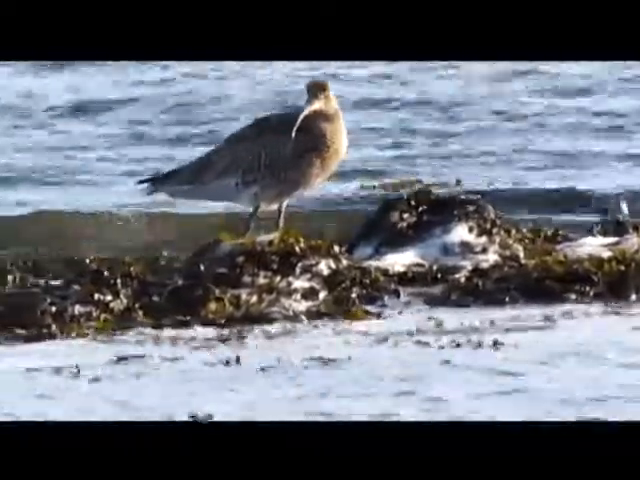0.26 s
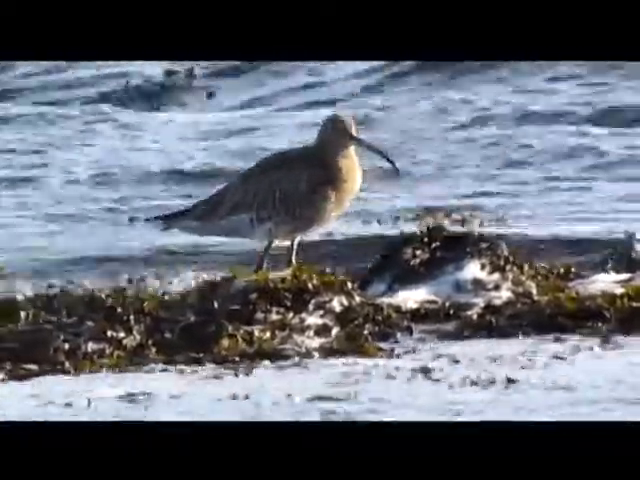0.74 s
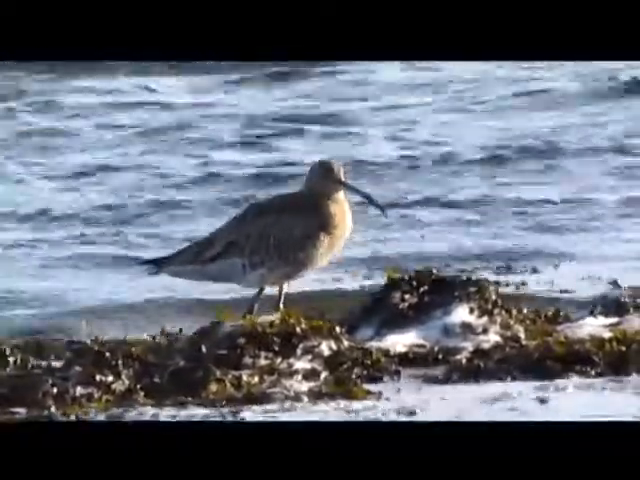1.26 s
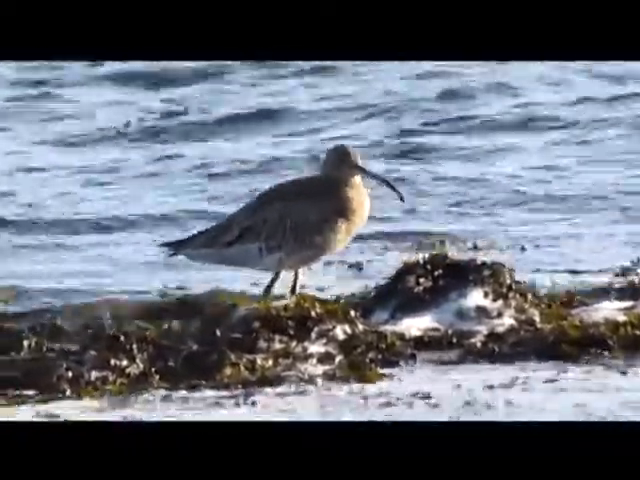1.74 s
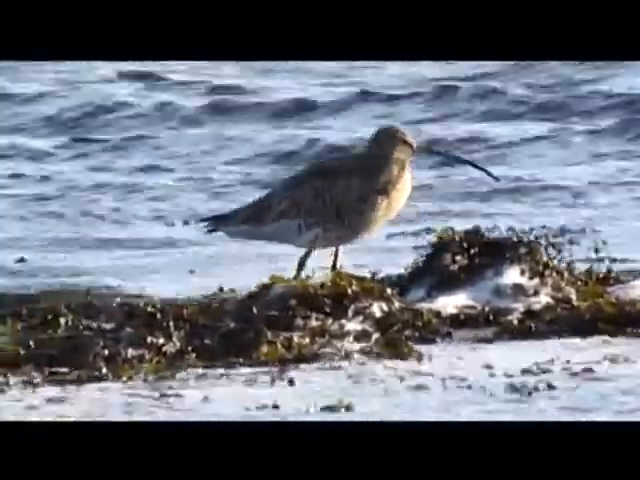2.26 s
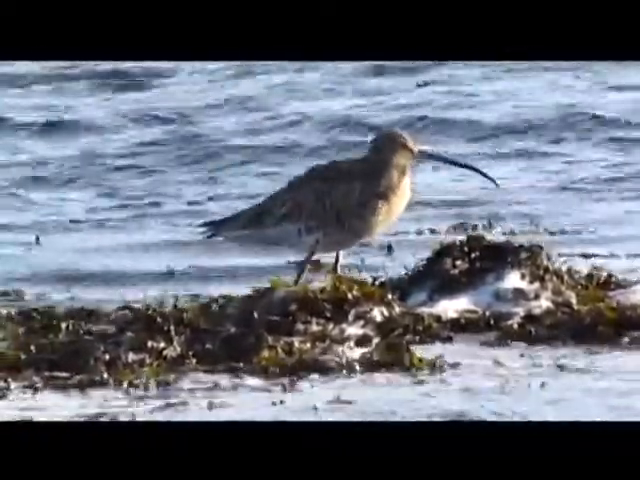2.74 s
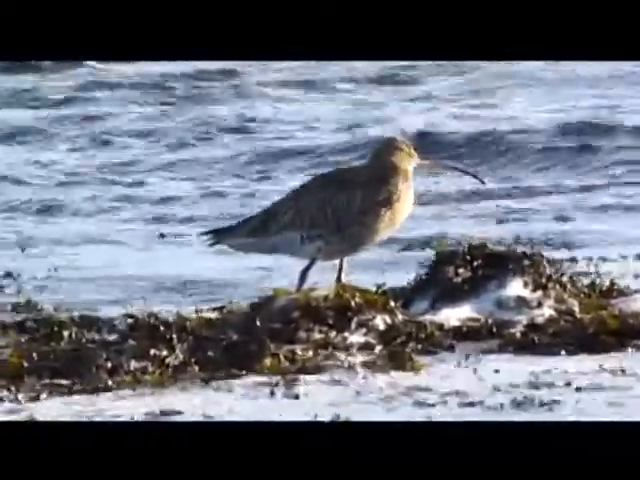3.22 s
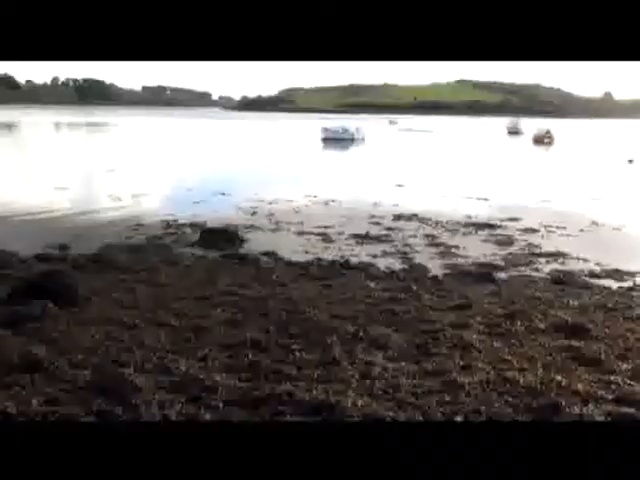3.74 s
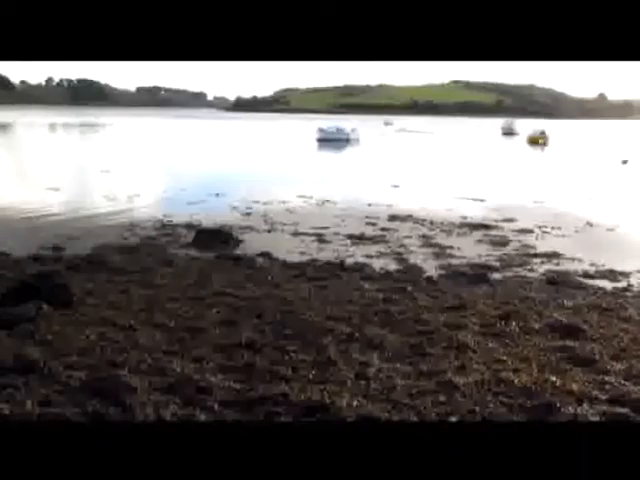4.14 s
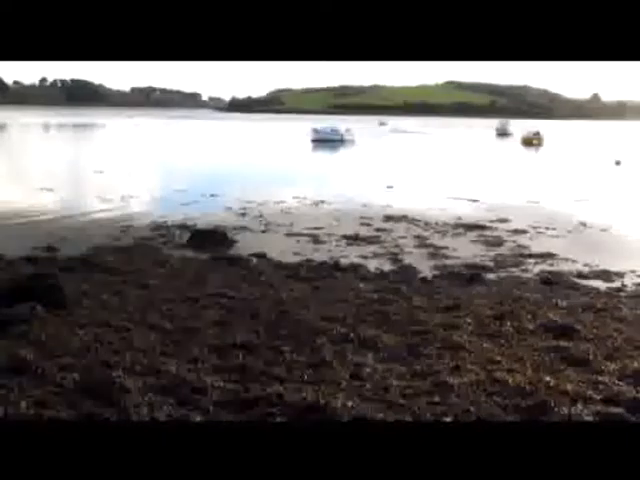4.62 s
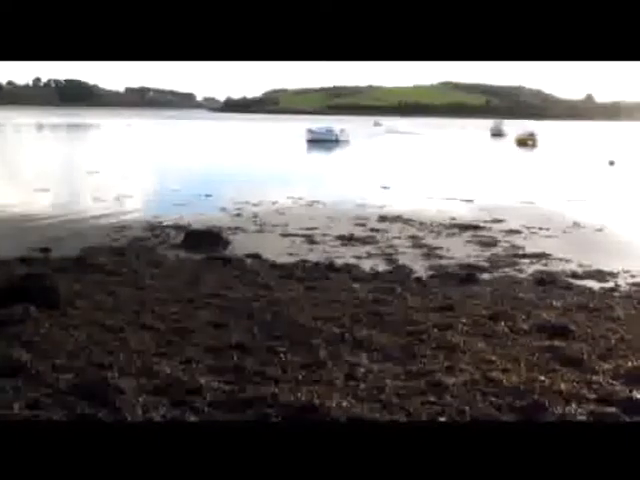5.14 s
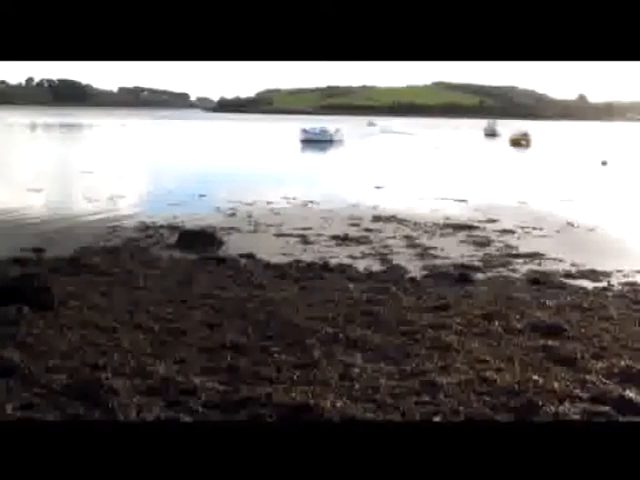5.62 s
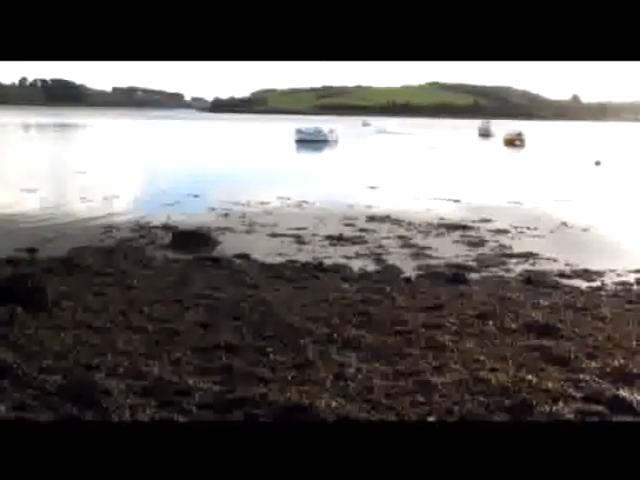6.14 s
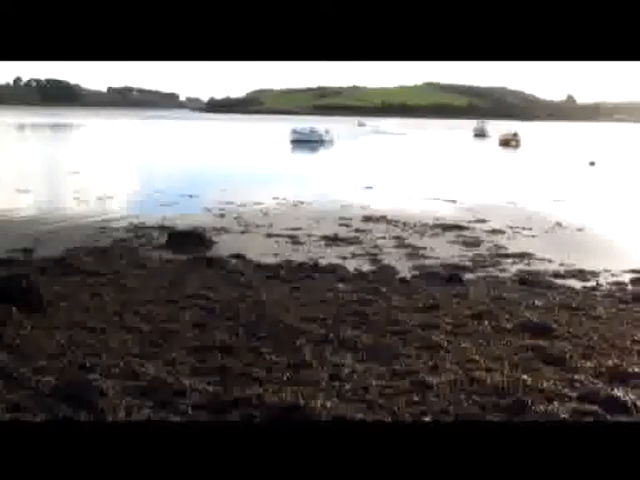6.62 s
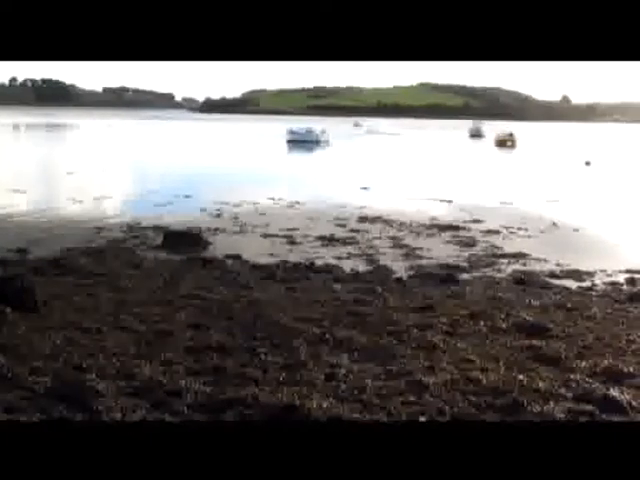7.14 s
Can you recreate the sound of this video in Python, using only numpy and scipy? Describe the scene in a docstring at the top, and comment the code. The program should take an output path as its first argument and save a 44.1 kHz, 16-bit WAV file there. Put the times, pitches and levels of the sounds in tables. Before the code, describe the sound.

Curlew-like bubbling over a distant throbbing warble, followed by repeated raspy, swooping whistles on open mudflats, the last phrase weak, then silence and a faint tick.

```python
"""Wading birds on an estuary: five phrases in which a hoarse rasp breaks into clear, wavering whistles, the last
one weaker. A bubbling trill comes first, over a far throbbing warble and hiss. Whistles are gliding near-sines,
rasps are resonant noise chopped into puffs, the warble is narrow noise flipping between two notes; sparse echoes
stand for the flats. A dish microphone and a narrow-band recorder take it in, cut to silence; a faint tick ends it."""
import sys
import numpy as np
from scipy import signal
from scipy.fft import rfft, irfft
from scipy.io import wavfile
from scipy.ndimage import uniform_filter1d

SR = 44100
rng = np.random.default_rng(int(sys.argv[2]) if len(sys.argv) > 2 else 0)


def transcribe(u):
    """Save the signal u as a 16-bit wav file named by the first command-line argument.

    u: samples, shape (n,) or (channels, n), limited to [-1, 1]; the rate is SR.
    q: integer samples, one column per channel.
    """
    v = np.clip(np.atleast_2d(u).T, -1, 1)
    q = np.round(v * 32767).astype(np.int16)
    wavfile.write(sys.argv[1], SR, q)


N = 325458

# Hiss colour before levelling: (frequency [Hz], relative density [dB per Hz])
HISS_COLOUR = [(380, -66), (650, -27.5), (859, -5), (1370, -7.5), (1530, -6), (2080, -4.5), (4350, -15.5),
               (5660, -42), (9570, -120)]
# Hiss over time: (time [s], level [dB])
HISS_LEVEL = [(0, -50.5), (1, -54.5), (2, -51), (2.401, -54.5), (2.95, -61), (3.099, -59.5), (4.602, -61.5),
              (6.398, -68.5), (7.192, -90)]
# Low hiss colour before levelling: (frequency [Hz], relative density [dB per Hz])
LOW_HISS_COLOUR = [(100, -39), (170, -1.5), (400, -7), (700, -5), (1500, -13), (4500, -22)]
# Leak of the recorder's mirrored band: (frequency [Hz], gain [dB])
MIRROR_LEAK = [(6300, -8), (7200, -28.5), (7900, -55.5), (9000, -59), (10000, -81.5)]
# Faint tick at the end: (frequency [Hz], starting level [dB], decay by 60 dB [s])
TICK_TONES = [(522, -52, 0.15), (3460, -53, 0.26)]
# Far warble, about which each voice swings:
# (time [s], low voice [Hz], low level [dB], high voice [Hz], high level [dB])
FAR_WARBLE = [(0, 880, -56.5, 1429, -55.5), (.5, 843, -51.5, 1416, -49), (1.0, 865, -46.5, 1426, -47),
              (1.5, 897.4, -44, 1525, -52), (1.95, 892, -41, 1534, -49), (2.1, 860, -51, 1470, -73)]
# Echo tail over the flats: (frequency [Hz], decay by 60 dB [s])
FLATS_DECAY = [(800, 0.46), (1400, 0.47), (1900, 1.24), (2500, 0.21), (4000, 0.64)]
# Quick rising chirp that opens each run of the trill: (time [s], level [dB])
PICKUPS = [(0, -62.5), (0.741, -62), (1.481, -62.5)]
# Short notes of the trill's lower voice, each an arch of pitch and level:
# (start [s], climb [s], drop [s], crest pitch [Hz], crest level [dB])
BUBBLES = [(0.018, 0.011, 0.018, 1750, -40.5), (0.05, 0.031, 0.021, 1855, -34.5),
           (0.105, .027, 0.016, 2020, -28.5), (0.181, 0.0098, 0.01, 2097, -24.5),
           (0.225, 0.03, 0.014, 2100, -29.5), (0.31, 0.0023, 0.023, 2055, -34.5),
           (0.418, 0.0035, 0.0098, 2053, -36.5), (0.758, 0.011, .014, 1740, -40.5),
           (0.784, 0.03, 0.043, 1840, -34.5), (.848, 0.027, 0.0098, 1990, -32.5),
           (.923, 0.0044, 0.019, 2046, -24.5), (0.983, 0.0026, .024, 2092, -22),
           (1.041, 0.0062, .026, 2094, -24.5), (1.178, 0.0015, 0.016, 2100, -27.5),
           (1.354, 0.0022, .008, 2490, -32), (1.493, 0.0086, 0.011, 1790, -36),
           (1.517, 0.0089, 0.013, 2054, -38), (1.541, 0.0045, 0.024, 1913, -35),
           (1.58, 0.023, 0.033, 1980, -36), (1.637, 0.027, 0.028, 2020, -37),
           (1.714, 0.0087, .015, 2020, -35.5)]
# Short notes of the trill's upper voice, which climb and break off: (start [s], end [s], top [Hz], top level [dB])
FLIPS = [(0.16, 0.182, 2570, -29), (0.274, 0.311, 2590, -28), (0.887, 0.926, 2540, -36),
         (0.951, 0.986, 2585, -27.5), (1.015, 1.042, 2560, -28), (1.762, 1.79, 2480, -30)]
# Held notes of the trill and of far birds, a list of turning points each: (time [s], pitch [Hz], level [dB])
HELD_NOTES = [
    [(.338, 2483, -31.5), (.367, 2577, -27.5), (.4, 2484, -37.5), (.423, 2620, -44)],
    [(.445, 2510, -56), (.475, 2570, -42.5), (.497, 2466, -48.5), (.545, 2500, -38.5), (.597, 2448, -40.5),
     (.622, 2900, -32.5)],
    [(1.082, 2455, -29), (1.102, 2478, -23.5), (1.146, 2443, -34.5), (1.18, 2580, -23.5)],
    [(1.202, 2410, -24), (1.216, 2364, -32.5), (1.242, 2550, -24), (1.272, 2420, -35.5), (1.3, 2583, -25.5),
     (1.332, 2354, -34.5), (1.357, 2970, -30.5)],
    [(1.685, 1783, -39.5), (1.74, 1806, -39.5), (1.87, 1746, -40), (1.912, 1950, -37.5)],
    [(1.887, 2340, -44), (1.931, 2360, -39), (1.955, 2285, -45)],
    [(2.032, 1668, -43), (2.136, 1633, -49.5)],
    [(2.667, 2430, -49.5), (2.684, 2460, -58)],
    [(2.79, 1870, -63.5), (2.95, 1980, -67.5)],
]
# Hoarse stretches where the whistle gives way:
# (start [s], end [s], start level [dB], middle level [dB], end level [dB])
RASPS = [(3.0, 3.065, -67, -40, -32.5), (3.099, 3.157, -43.5, -44.5, -41),
         (3.181, 3.198, -34, -36.5, -29.5), (3.265, 3.344, -48.5, -36, -26),
         (3.408, 3.439, -44.5, -38.5, -29), (3.864, 3.911, -49.5, -29.5, -26.5),
         (3.95, 4.091, -42, -47.5, -25), (4.161, 4.264, -42.5, -41.5, -27),
         (4.735, 4.778, -53, -36.5, -23.5), (4.835, 4.948, -33.5, -35.5, -23.5),
         (5.024, 5.088, -40, -31.5, -21.5), (5.651, 5.714, -52, -30, -19.5),
         (5.784, 5.887, -33, -32, -25.5), (5.995, 6.021, -34, -31, -25.5), (6.541, 6.591, -62, -39, -27.5),
         (6.638, 6.646, -42, -44, -44), (6.676, 6.808, -48.5, -42.5, -38.5)]
# Partials of the two voices that clash in a rasp:
# (start [Hz], end [Hz], blur before scaling by length [Hz], relative level [dB])
THROAT_PARTIALS = [(1076, 1100, 740, -7.5), (1233, 1843, 450, 5.5), (1730, 2360, 780, 6.5),
                   (2870, 3400, 560, -2.5), (3180, 4100, 910, -8)]
# Crests and troughs of the phrases, one list a phrase, before scoops, accents and catches:
# (time [s], pitch [Hz], level [dB])
PHRASES = [
    [(3.067, 1787, -27.5), (3.102, 1470, -38), (3.213, 1990, -21), (3.262, 1408, -32.5), (3.342, 2384, -18),
     (3.358, 1960, -25), (3.39, 1480, -31.5), (3.45, 1997, -20.5), (3.49, 1604, -29), (3.54, 1829, -25),
     (3.588, 1670, -29), (3.632, 1723, -28.5), (3.65, 1592, -43)],
    [(3.908, 1957, -20), (3.957, 1399, -28), (4.102, 2052, -17.5), (4.155, 1428, -31.5),
     (4.274, 2055, -17.5), (4.316, 1512, -29.5), (4.394, 1923, -21), (4.435, 1642, -27.5),
     (4.472, 1537, -29.5), (4.486, 1474, -38)],
    [(4.788, 1945, -17.5), (4.842, 1294, -24), (4.962, 2041, -14.5), (5.018, 1352, -30), (5.1, 2115, -15.5),
     (5.145, 1483, -26), (5.22, 1984, -18), (5.262, 1557, -27.5), (5.333, 1942, -21), (5.372, 1723, -24.5),
     (5.395, 1540, -32)],
    [(5.712, 2053, -15.5), (5.778, 1343, -27.5), (5.909, 2073, -15.5), (5.962, 1483, -25.5),
     (6.043, 2070, -17), (6.09, 1488, -26), (6.152, 1991, -19), (6.198, 1614, -27), (6.276, 1697, -27)],
    [(6.596, 1982, -24), (6.66, 1340, -43), (6.827, 2076, -29.5), (6.882, 1467, -38.5),
     (6.968, 2063, -33.5), (7.008, 1522, -41.5), (7.08, 1995, -40.5), (7.125, 1685, -46),
     (7.168, 1666, -52.5)],
]
# The voice jumps to the overtone of a weak low tone:
# (start [s], end [s], start pitch [Hz], end pitch [Hz], start level [dB], end level [dB])
JUMPS = [(3.144, 3.18, 2044, 2270, -32, -28.5), (4.055, 4.07, 2146, 2330, -41.5, -25),
         (4.193, 4.244, 1936, 2300, -39, -25.5), (5.735, 5.76, 2213, 1960, -24, -29),
         (5.937, 5.951, 2034, 2010, -35, -25.5), (6.073, 6.123, 2052, 1980, -29, -27.5),
         (6.619, 6.641, 2166, 2060, -34, -42), (6.853, 6.869, 2093, 2010, -44.5, -44)]
# The voice catches while it falls: (time [s], level change [dB])
CATCHES = [(3.232, -6), (4.139, -5), (4.813, -3), (4.988, -11.5)]

LOW_HISS_DB = -72
THROBS_PER_S = 12.3
BAND_HZ, CLOCK_HZ, EDGE_HZ = 4700, 11025, 10300  # recorder band, converter clock, final edge
STOP_S, TICK_S = 7.189, 7.349  # cut to silence, then the tick
# How far a bubble lies under its crest (share of pitch, dB) that long before and after it
CLIMB_S, CLIMB_SHARE, CLIMB_DB = 0.04, 0.07, -7.5
DROP_S, DROP_SHARE, DROP_DB = 0.029, 0.11, -10
FLIP_SHARE, FLIP_DB = 0.05, -5.5  # a flip starts this far under its top
RISE_LATE, FALL_LATE = 1.5, 0.9  # powers of time: a rise lingers low, a fall sets in a little early
ACCENT_DB, ACCENT_S = 1, 0.0028  # each phrase whistle starts hard
SCOOP_SHARE, SCOOP_S = 0.05, 0.008  # a whistle that starts on a rise scoops up from below
CATCH_S = 0.006


def gain_of(db):
    """Decibels to gain."""
    return 10 ** (np.asarray(db) / 20)


def evened(x):
    """Scales to rms 1."""
    return x / np.sqrt(np.mean(x ** 2) + 1e-20)


def read(points, hz):
    """Straight lines on a log-frequency axis."""
    f, value = np.transpose(points)
    return np.interp(np.log(hz + 1), np.log(f + 1), value)


def curves(rows, round_s):
    """Start time and the columns at sample rate, with corners rounded."""
    s, *columns = np.transpose(rows)
    t = np.arange(s[0], s[-1], 1 / SR)
    size = 1 + round(round_s * SR)
    return s[0], [uniform_filter1d(np.interp(t, s, c), size, mode="nearest") for c in columns]


def add(mix, s, sound):
    """Mixes a sound in at s seconds."""
    part = mix[round(s * SR):][:len(sound)]
    part += sound[:len(part)]


def smooth_noise(n, hz):
    """Noise of rms 1, low-passed at hz."""
    noise = rng.standard_normal(n + 2000)
    return evened(signal.lfilter(*signal.butter(2, hz, fs=SR), noise)[2000:])


def resonate(x, hz, width):
    """Shifts hz down to zero, smooths, and shifts back: a resonance of gain 1."""
    turn = np.exp(2j * np.pi * np.cumsum(hz * np.ones(len(x))) / SR)
    r = np.exp(-np.pi * width / SR)
    return 2 * (turn * signal.lfilter([1 - r], [1, -r], x / turn)).real


def resonate_twice(x, hz, width):
    """Two equal resonances in a row, for steeper skirts."""
    return resonate(resonate(x, hz, width), hz, width)


def hiss(spectrum, patchy_db):
    """Random short-time spectra with drifting patches, at rms 1."""
    hz = np.fft.rfftfreq(512, 1 / SR)
    a, b, patches = rng.standard_normal((N // 128 + 5, 257, 3)).T
    patches = evened(uniform_filter1d(uniform_filter1d(patches, 4, 0), 24, 1))
    z = (a + 1j * b) * gain_of(read(spectrum, hz)[:, None] + patchy_db * patches)
    return evened(signal.istft(z, nperseg=512, noverlap=384)[1][:N])


def background_hiss():
    """A hiss whose level drifts, over a steady, weaker low hiss."""
    s, level_db = np.transpose(HISS_LEVEL)
    level = gain_of(np.interp(np.arange(N) / SR, s, level_db))
    low = gain_of(LOW_HISS_DB) * hiss(LOW_HISS_COLOUR, patchy_db=0.5)
    return level * hiss(HISS_COLOUR, patchy_db=1.2) + low


def tick():
    """Two faint, unsteady tones struck together after the silence, each dying exponentially."""
    t = np.maximum(np.arange(N) / SR - TICK_S, 0)
    wobble = 1 + 0.55 * smooth_noise(N, 164)
    tones = [gain_of(db - 60 * t / t60) * np.sin(2 * np.pi * hz * t) for hz, db, t60 in TICK_TONES]
    return wobble * sum(tones)


def warble():
    """Two far voices of narrow noise that flip together between an upper and a lower note."""
    s, (low_hz, low_db, high_hz, high_db) = curves(FAR_WARBLE, 0.081)
    cycles = THROBS_PER_S * np.arange(len(low_hz)) / SR + 0.033
    swing = np.tanh(3.9 * np.cos(2 * np.pi * cycles))
    out = np.zeros(N)
    # pitch, level, depth of the swing (share), blur in Hz, level swing in dB
    low_voice = (low_hz, low_db, 0.1, 45, 2.5)
    high_voice = (high_hz, high_db, 0.06, 60, 4.0)
    for hz, db, depth, width, upper_db in (low_voice, high_voice):
        air = rng.standard_normal(len(hz))
        voice = evened(resonate_twice(air, hz * (1 + depth * swing), width))
        fade = 0.42 + 0.14 * swing ** 2  # weaker while it flips
        add(out, s, gain_of(db + upper_db * swing) * voice * fade)
    return out


def flats(x):
    """Sparse echoes of random sign from mud and water, each band dying at its own speed."""
    taps = np.zeros(2 * SR)
    at = np.arange(400, 2 * SR - 20, 20) + rng.integers(0, 20, (2 * SR - 401) // 20)
    taps[at] = rng.choice([-1., 1.], at.shape)
    hz, t, z = signal.stft(taps, SR, nperseg=256)
    t60 = np.maximum(read(FLATS_DECAY, hz), 0.1)[:, None]
    tail = signal.istft(z * gain_of(-60 * t / t60), SR, nperseg=256)[1]
    return signal.fftconvolve(x, tail / np.linalg.norm(tail))[:N]


def whistle(rows, overtones_db, rough, attack_s, half_db=-120):
    """A near sine that flutters; the beak favours overtones near 3.8 kHz; half_db is an octave below."""
    end_s, end_hz, end_db = rows[-1]
    rows = [*rows, (end_s + 0.006, end_hz, end_db - 24)]  # each note dies in 6 ms
    s, (hz, level) = curves([(s, hz, gain_of(db)) for s, hz, db in rows], 0.011)
    n = len(hz)
    turn = 2 * np.pi * (np.cumsum(hz) / SR + rng.random())
    tone = np.sin(turn) + gain_of(half_db) * np.sin(turn / 2)
    for k, db in enumerate(overtones_db, 2):
        beak_db = -9.0 * np.clip((abs(k * hz - 3750) - 300) / 500, 0, 1.5) ** 2
        unsteady = 1 + 0.55 * smooth_noise(n, 140)
        tone += gain_of(db + beak_db) * np.sin(k * turn) * unsteady
    flutter = 1 + rough * smooth_noise(n, 120)
    i = np.arange(n)
    ends = np.clip(np.minimum(i / attack_s, i[::-1] / 0.002) / SR, 0, 1)
    return s, np.sqrt(2) * level * tone * flutter * np.sin(np.pi / 2 * ends) ** 2


def glide(points, t):
    """Rows at times t that ease from one turning point to the next."""
    s, hz, db = np.transpose(points)
    k = np.clip(np.searchsorted(s, t) - 1, 0, len(s) - 2)
    late = np.where(hz[k + 1] > hz[k], RISE_LATE, FALL_LATE)
    u = np.clip((t - s[k]) / (s[k + 1] - s[k]), 0, 1) ** late
    ease = np.sin(np.pi / 2 * u) ** 2
    return np.transpose([t, hz[k] + ease * (hz[k + 1] - hz[k]), db[k] + ease * (db[k + 1] - db[k])])


def moments(start, end):
    """Times at most about 2 ms apart."""
    return np.linspace(start, end, 3 + round(abs(end - start) / 0.002))


def effort(voice):
    """Short-term loudness of a voice, which drives its breath."""
    return np.sqrt(abs(uniform_filter1d(voice ** 2, 1600)))


def beak_air():
    """Air hissing through the beak: band noise around 3.6 kHz, at rms 1."""
    band = signal.butter(5, (3150, 4150), "band", fs=SR, output="sos")
    return evened(signal.sosfilt(band, rng.standard_normal(N)))


def bubble(start, climb_s, drop_s, hz, db):
    """A climb to the crest and a drop after it, cut to the length of the note."""
    crest = start + climb_s
    arch = [(crest - CLIMB_S, hz * (1 - CLIMB_SHARE), db + CLIMB_DB),
            (crest, hz, db),
            (crest + DROP_S, hz * (1 - DROP_SHARE), db + DROP_DB)]
    return glide(arch, moments(start, crest + drop_s))


def bubbling_trill():
    """Low bubbles, upper flips, held notes and opening chirps, with air under the notes."""
    trill = np.zeros(N)
    notes = [bubble(*row) for row in BUBBLES]
    notes += [[(start, hz * (1 - FLIP_SHARE), db + FLIP_DB), (end, hz, db)] for start, end, hz, db in FLIPS]
    notes += [glide(p, moments(p[0][0], p[-1][0])) for p in HELD_NOTES]
    for rows in notes:
        add(trill, *whistle(rows, (-33,), rough=0.06, attack_s=0.005))
    for s, db in PICKUPS:
        chirp = [(s, 1130, db - 4), (s + 0.013, 1270, db), (s + 0.019, 1480, db - 15)]
        add(trill, *whistle(chirp, (38, 14), rough=0.4, attack_s=0.004))
    return trill + gain_of(-32) * effort(trill) * resonate_twice(beak_air(), 3950, 500)


def rasp(rows, linger_s=0.033, fade_db=22):
    """Two unsteady voices rise together, chopped into uneven puffs; hoarseness lingers into the next whistle."""
    start_s, start_db = rows[0]
    end_s, end_db = rows[-1]
    rows = [(start_s - 0.025, start_db - 14), *rows,
            (end_s + 0.001, end_db - 9), (end_s + linger_s, end_db - fade_db)]
    s, (level_db,) = curves(rows, 0.011)
    n = len(level_db)
    turns = np.cumsum(130 * gain_of(2.6 * smooth_noise(n, 60))) / SR  # about 130 puffs a second
    sizes = gain_of(2.3 * np.clip(rng.standard_normal(100), -2, 1.2))
    puffs = 0.6 + sizes[turns.astype(int) % 100] * np.sin(np.pi * (turns % 1) ** 0.6) ** 2
    rise, air, voices = np.linspace(0, 1, n), rng.standard_normal(n), np.zeros(n)
    for start_hz, end_hz, blur, db in THROAT_PARTIALS:
        hz = start_hz + (end_hz - start_hz) * rise
        width = blur * (0.35 + 2.5 * np.exp(-n / SR / 0.055))  # short rasps are the harshest
        voices += gain_of(db) * evened(resonate_twice(air, hz, width))
    fades = signal.windows.tukey(n, min(0.059 * SR / n, 1))
    return s, gain_of(level_db) * evened(voices * puffs) * fades


def clear_parts(points):
    """The stretches of a phrase that rasps and jumps leave free, with scoops, accents and catches."""
    last_s = points[-1][0]
    breaks = sorted(row[:2] for row in RASPS + JUMPS if row[0] < last_s) + [(last_s, last_s)]
    free = points[0][0] - 0.01
    for start, end in breaks:
        if start - free > 0.012:  # shorter gaps stay without a whistle
            t, hz, db = glide(points, moments(free, start)).T
            scoop = (hz[1] > hz[0]) * SCOOP_SHARE * np.exp(-(t - free) / SCOOP_S)
            catch_db = sum(depth_db * np.exp(-((t - s) / CATCH_S) ** 2) for s, depth_db in CATCHES)
            accent_db = ACCENT_DB * np.exp(-(t - free) / ACCENT_S)
            yield np.transpose([t, hz * (1 - scoop), db + catch_db + accent_db])
        free = max(free, end)


def whistled_phrases():
    """Clear whistles and voice jumps with air under them, and the rasps that break into them."""
    phrases = np.zeros(N)
    for points in PHRASES:
        for rows in clear_parts(points):
            add(phrases, *whistle(rows, (-19, -30), rough=0.03, attack_s=0.004))
    for start, end, start_hz, end_hz, start_db, end_db in JUMPS:
        rows = [(start, start_hz, start_db), (end, end_hz, end_db)]
        add(phrases, *whistle(rows, (-34,), rough=0.05, attack_s=0.006, half_db=-22))
    phrases += gain_of(-33) * effort(phrases) * beak_air()
    for start, end, start_db, middle_db, end_db in RASPS:
        add(phrases, *rasp([(start, start_db), ((start + end) / 2, middle_db), (end, end_db)]))
    return phrases


def scene():
    """Trill, phrases and their echoes over warble and hiss."""
    trill, phrases = bubbling_trill(), whistled_phrases()
    echoes = flats(gain_of(-15) * trill + gain_of(-23) * phrases)
    birds = trill + phrases + echoes + warble()
    dish = signal.butter(6, 720, "high", fs=SR, output="sos")  # the dish passes no bass
    return (signal.sosfilt(dish, birds) + background_hiss())[None]


def record(dry):
    """Input offset shifting under loud notes, a slow converter clock whose mirrored band leaks, a cut, the tick."""
    t = np.arange(N) / SR
    loudness = np.sqrt(abs(uniform_filter1d(dry ** 2, 200)))
    shift = signal.sosfilt(signal.butter(3, 40, fs=SR, output="sos"), loudness)
    x = dry + 0.00146 + 0.03 * (shift - uniform_filter1d(shift, 3000))
    band = signal.firwin(601, BAND_HZ, window=("kaiser", 10), fs=SR)
    x = signal.oaconvolve(x, band[None], "same")
    hz = np.fft.rfftfreq(N, 1 / SR)
    mirrored = rfft(2 * x * np.cos(2 * np.pi * CLOCK_HZ * t))
    leak = irfft(mirrored * gain_of(read(MIRROR_LEAK, hz)) * (hz < CLOCK_HZ), N)
    cut = np.clip((STOP_S - t) / 0.00094, 0, 1)
    x = (x + leak) * cut + tick()
    edge = signal.firwin(511, EDGE_HZ, window=("kaiser", 9), fs=SR)
    return signal.oaconvolve(x, edge[None], "same")


dry = scene()
out = record(dry)
transcribe(out)
```